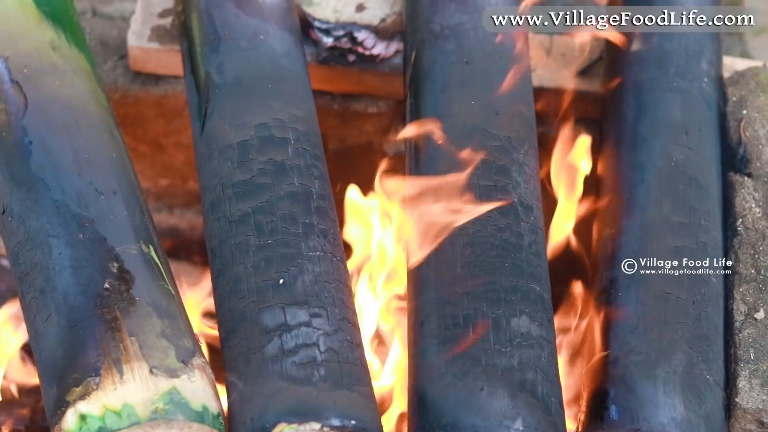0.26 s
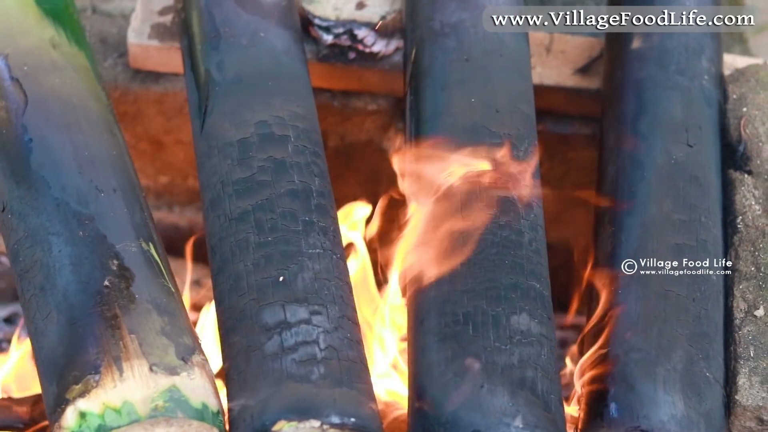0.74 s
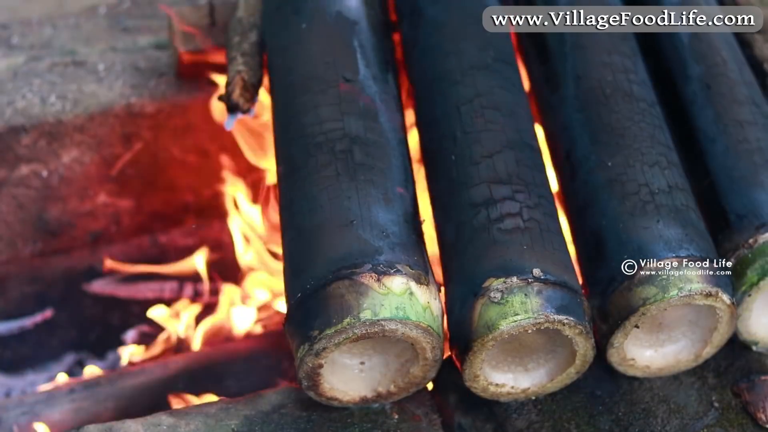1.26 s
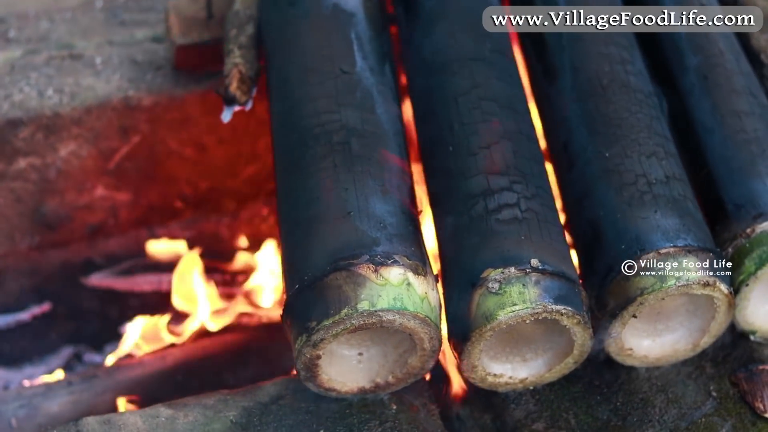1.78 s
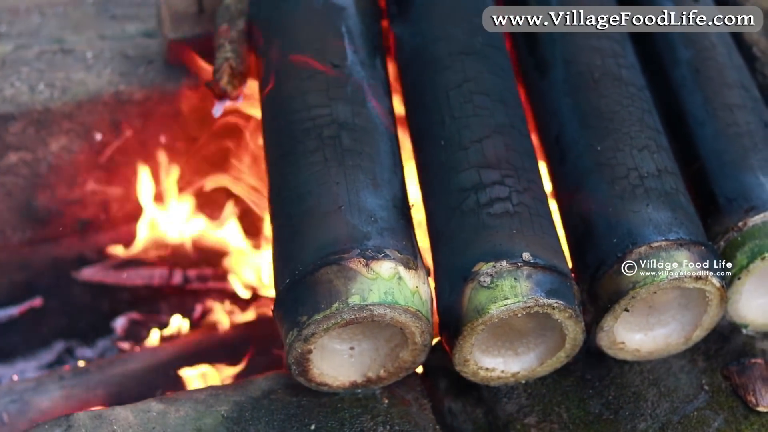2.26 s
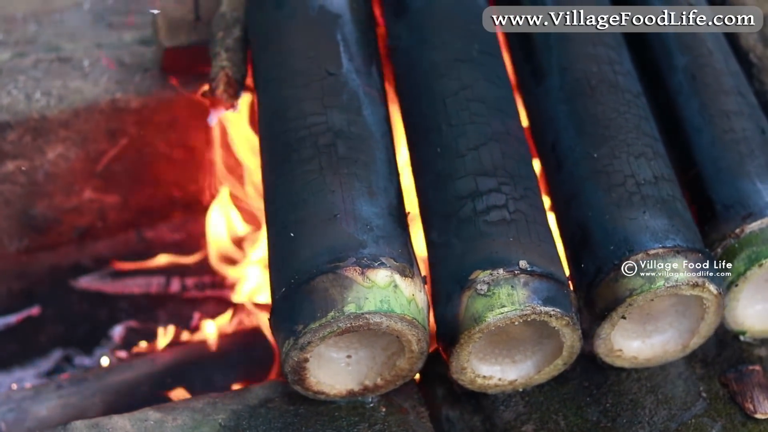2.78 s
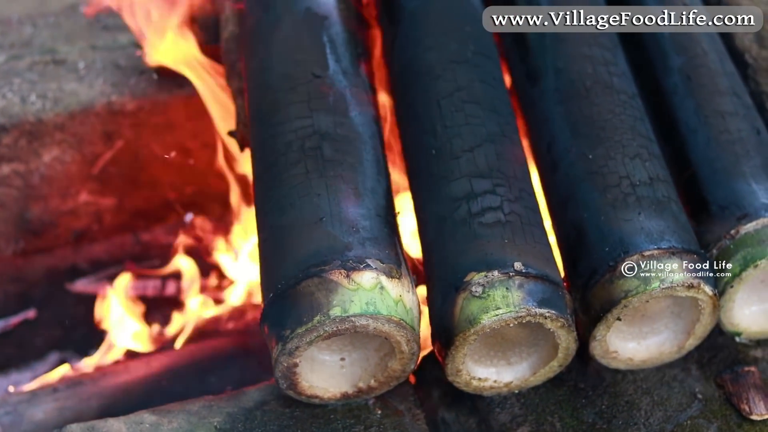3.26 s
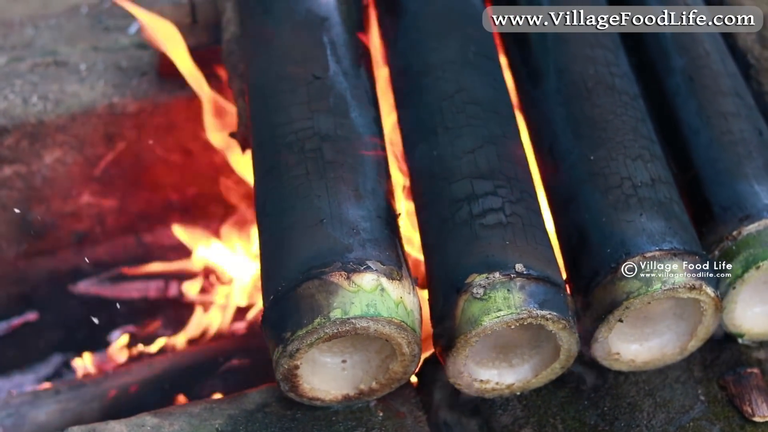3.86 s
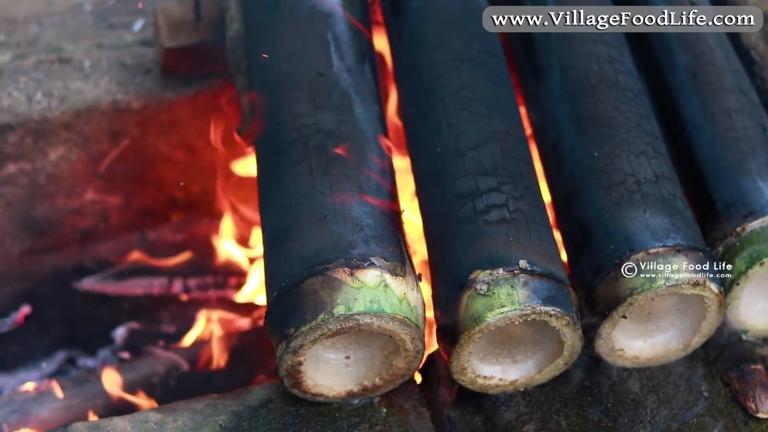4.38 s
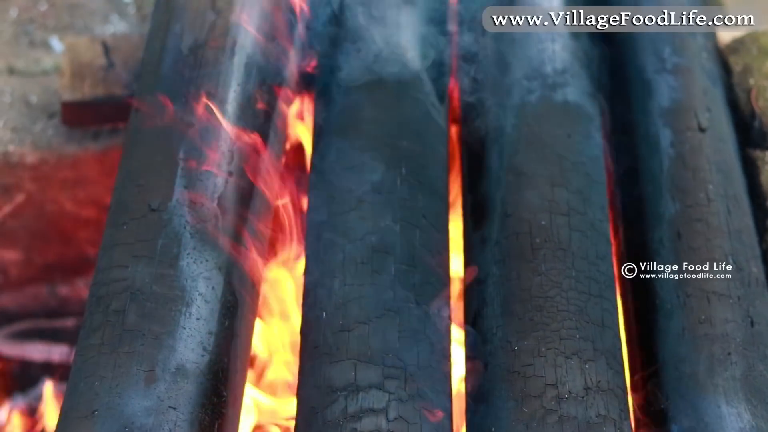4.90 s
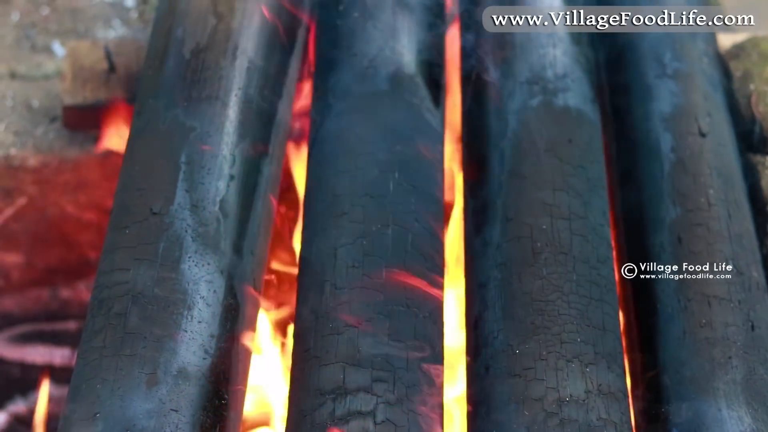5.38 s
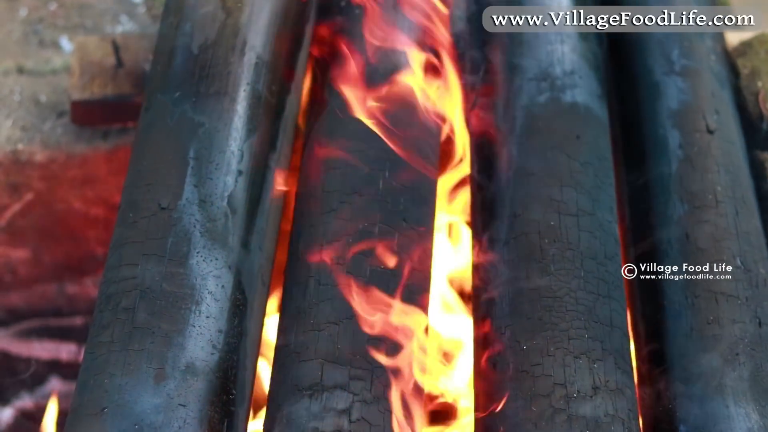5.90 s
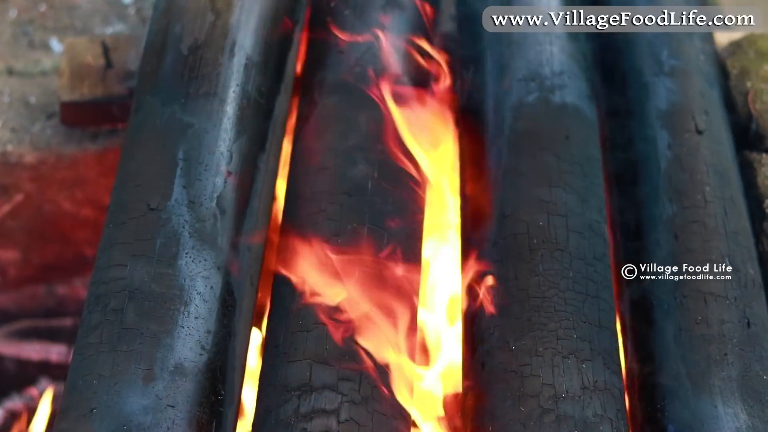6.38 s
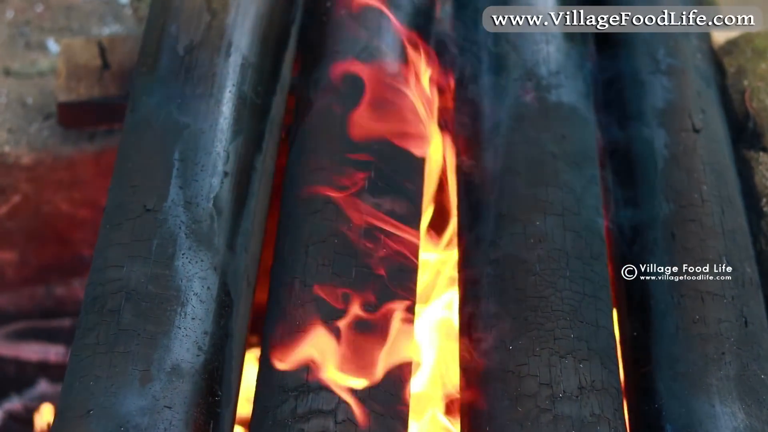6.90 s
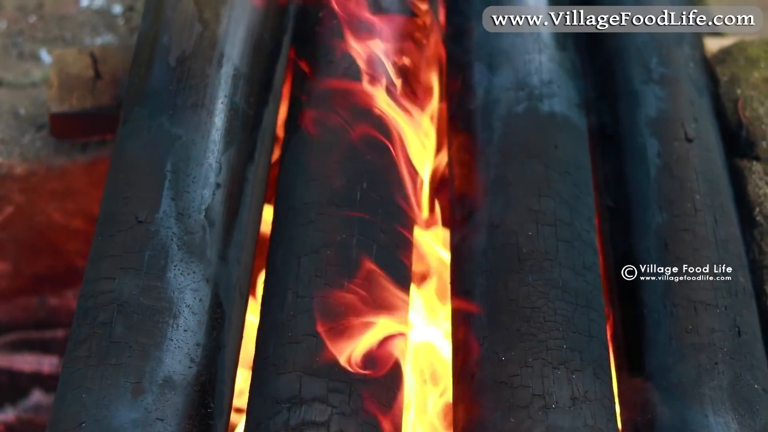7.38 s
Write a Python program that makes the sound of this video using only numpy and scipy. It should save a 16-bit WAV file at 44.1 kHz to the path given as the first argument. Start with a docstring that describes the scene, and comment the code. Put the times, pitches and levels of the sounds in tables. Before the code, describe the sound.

A quiet fire sizzle with faint hiss and a far engine's regular chugging opens; at about 1.2 seconds the perspective jumps closer to strong, airy steam jets, peaking near two seconds. A bright crack and a sharper snap follow. At 4.7 seconds the view shifts again to breathier hiss, low flame gusts and heavier, knocking wood pops with short outdoor echoes.

```python
"""A hiss throughout: sap boils out of splits in green bamboo tubes roasting over an open wood fire.
The steam is noise shaped by resonances and driven by a shared pressure curve; some splits sing alone.
Embers sizzle and tick, flames flutter in low puffs, and now and then wood bursts with a ringing pop.
Far off, a slow one-cylinder engine thumps: pulses ring through pipe resonances, over a bed of open air.
The scene is heard from three places in turn, each with its own levels."""
import sys
import numpy as np
from scipy import signal
from scipy.fft import rfft, irfft
from scipy.io import wavfile

SR = 44100
rng = np.random.default_rng(int(sys.argv[2]) if len(sys.argv) > 2 else 0)


def inscribe(sig):
    """Save sig as 16-bit PCM at rate SR to the path in sys.argv[1].

    A 1-D sig is mono; a 2-D sig holds one channel per row.
    Samples are clipped to [-1, 1] before scaling.
    """
    pcm = np.round(np.clip(np.atleast_2d(sig).T, -1, 1) * 32767)
    wavfile.write(sys.argv[1], SR, pcm.astype(np.int16))


N = 337365
TIME = np.arange(N) / SR
HZ = np.maximum(np.fft.rfftfreq(N, 1 / SR), 1)

# the three listening places: (start [s], end [s])
PLACES = [(0, 1.17), (1.17, 4.72), (4.72, 7.65)]

# steam pressure in the tubes, as a hiss level before each opening's own offset: (time [s], level [dB])
STEAM_PRESSURE = [(0.0, -58.5), (0.83, -60), (1.23, -49), (1.45, -48.5), (1.76, -49), (1.86, -44),
                  (2.04, -40.5), (2.3, -41), (2.68, -42.5), (2.9, -44), (3.64, -50), (4.69, -47),
                  (5.01, -51), (5.5, -49.5), (5.73, -52.5), (6.65, -54.5), (6.92, -51.5), (7.65, -53.5)]
# offset of each opening from that level, one value per place: (level [dB])
VENT_PLACE_DB = [-5, -2.5, 0.5]
SAP_PLACE_DB = [-3, 1, -3]
JET_PLACE_DB = [-10, -2, -1.5]
# resonances of each opening: (frequency [Hz], width [Hz], relative level [dB])
VENT_RESONANCES = [(6090, 620, 2.5), (6406, 440, 7.5), (6776, 490, 3.5), (7860, 300, -9), (10910, 710, 2.5)]
SAP_RESONANCES = [(4000, 480, -7.5), (4535, 480, -4.5), (5100, 360, -4), (5740, 480, -2.5),
                  (6380, 310, -1.5), (7010, 470, 3), (7720, 660, 1.5), (8260, 460, 2.5), (8760, 390, 1.5),
                  (9300, 510, 0), (10150, 760, -2), (13200, 550, -12), (14100, 600, -7.5), (14700, 480, -7),
                  (15300, 490, -9)]
JET_RESONANCES = [(7950, 420, -4), (8500, 290, -6.5), (9240, 450, -1), (9920, 440, 2), (10540, 780, 3.5),
                  (11600, 280, -2), (12950, 1200, -11.5)]
# an opening clears and spurts: (start [s], time from start to fading [s], lift [dB], opening [name])
SPURTS = [(0.868, 0.06, 1, "vent"), (0.873, 0.054, 5.5, "sap"), (1.07, 0.042, 6, "sap"),
          (1.183, 0.07, 6, "jet"), (1.175, 0.42, 3, "sap"), (1.187, 0.23, 3.5, "vent"),
          (1.35, 0.15, 5.5, "jet"), (1.366, 0.041, 2.5, "sap"), (1.978, 0.095, 3, "sap"),
          (1.986, 0.086, 2, "jet"), (2.348, 0.09, 3, "sap"), (2.622, 0.079, 6.5, "jet"),
          (2.62, 0.43, 0.8, "sap"), (3.084, 0.14, 4, "jet"), (3.36, 0.11, 6, "jet"),
          (3.559, 0.12, 7.5, "jet"), (3.57, 0.11, 3, "sap"), (3.89, 0.29, 7, "jet"),
          (3.905, 0.12, 6.5, "vent"), (4.11, 0.08, 1.5, "vent"), (4.366, 0.28, 6.5, "jet"),
          (4.37, 0.5, 3, "vent"), (4.957, 0.23, 3.5, "jet"), (5.244, 0.16, 3, "vent"),
          (5.33, 0.45, 1.5, "jet"), (5.497, 0.16, 4.5, "sap"), (6.87, 0.1, 4, "sap"),
          (7.447, 0.093, 3, "vent")]
SPURT_ATTACK_S, SPURT_RELEASE_S = 0.021, 0.015
# splits that open and sing for a while:
# (start [s], end [s], swell time [s], pitch [Hz], width [Hz], average level before panning [dB])
SINGING_SPLITS = [(0.85, 2.0, 0.081, 3380, 380, -61.5), (0.78, 1.373, 0.12, 5740, 1200, -58),
                  (0.819, 1.0, 0.076, 4800, 4500, -57), (0.988, 1.2, .03, 7240, 280, -62),
                  (1.13, 1.25, 0.035, 4140, 400, -59), (1.17, 1.3, .025, 14400, 3000, -53),
                  (1.2, 2.114, .03, 6000, 1100, -55.5), (1.36, 1.5, .03, 14200, 1500, -58),
                  (1.2, 2.04, .05, 4770, 300, -61), (1.86, 2.5, 0.076, 4660, 756, -57),
                  (2.02, 2.12, .025, 13500, 3000, -54), (2.354, 2.43, .02, 12800, 4000, -45),
                  (2.364, 2.42, .012, 4700, 2000, -53), (2.47, 2.55, 0.04, 3840, 320, -50),
                  (1.902, 4.9, .03, 1843, 330, -70.5), (3.49, 3.72, .04, 7950, 400, -55),
                  (3.9, 4.7, .04, 14600, 2500, -61), (4.72, 7.7, 0.024, 3020, 710, -62.5),
                  (4.728, 4.897, 0.026, 3040, 520, -58.5), (4.97, 5.158, 0.024, 3010, 450, -58.5),
                  (5.34, 5.65, .05, 2950, 450, -61), (5.78, 5.903, 0.025, 2900, 416.7, -54.5),
                  (6.68, 6.8, 0.032, 3000, 450, -59), (6.848, 6.95, .03, 3000, 450, -57),
                  (4.9, 6.996, .03, 3820, 509.3, -67.5), (4.72, 5.897, 0.035, 5330, 1700, -63),
                  (5.5, 5.95, .03, 11620, 260, -58), (4.733, 5.7, .03, 12700, 1500, -58),
                  (4.75, 7.7, 0.037, 8900, 2200, -62.5), (5.7, 7.74, .07, 12600, 2000, -65)]

# the fire at each place, before the settings of each layer: (relative level [dB])
EMBER_PLACE_DB = [-63, -58, -56.5]
FLAME_PLACE_DB = [-63.5, -68, -65]
# spectra of the sizzle, the flame flutter and the open air: (frequency [Hz], relative level per Hz [dB])
EMBER_SPECTRUM = [(400, -18.5), (800, -7.5), (1350, -4.5), (1800, -0.5), (2200, -1), (3000, 2.5),
                  (4000, 1.5), (5300, -0.5), (8000, -8.5), (11000, -11), (12000, -1), (15500, -9.5)]
FLUTTER_SPECTRUM = [(60, -3.5), (130, -0.5), (200, 1.5), (310, 1), (400, -15), (520, -10), (900, -12),
                    (2000, -49)]
AIR_SPECTRUM = [(20, -32), (45, 1.5), (56, 4), (64, 5), (76, 7), (160, -4), (400, -12.5), (1000, -11),
                (1500, -12.5), (3000, -16), (7000, -28), (15500, -32)]
# big tongues of flame tearing off:
# (time at the height [s], swell time [s], flutter lift [dB], rush pitch [Hz], rush level before panning [dB])
FLAME_TONGUES = [(0.115, .025, 3, 250, -58), (0.228, 0.019, 2, 270, -54), (0.44, 0.023, -1, 307, -59),
                 (0.478, .012, 1, 230, -60), (1.4, 0.032, 1, 330, -62.5), (2.0, 0.036, 4, 204, -56),
                 (2.53, 0.028, 3, 216, -60), (4.63, 0.024, 0, 180, -58.5), (4.765, 0.034, 2.5, 424, -57.5),
                 (4.795, .03, 2, 880, -61), (4.91, 0.03, 3, 346, -61), (5.025, 0.034, 4, 338, -55),
                 (5.385, .025, 7, 330, -57), (5.608, 0.023, 7, 258, -56), (6.53, 0.025, 0, 268, -61),
                 (6.635, .025, 4, 295, -61), (7.245, .03, 1, 177, -52.5), (7.52, 0.024, 3, 257, -58)]

# bursting wood, levels before a common trim: (time [s], thud [dB], knock [dB], clack [dB], crack [dB],
# snap [dB], spit [dB], tearing time [ms], pitch factor [ratio], extra scatter [dB])
WOOD_POPS = [(0.21, -52, -76, -66, -61, -68, -70, 5.5, 0.8, 0),
             (1.264, -47.5, -67, -66, -60, -59, -57, 1.2, 0.7, 1),
             (2.3657, -52.5, -59, -64, -52, -49, -39, 3.4, 0.94, -1),
             (4.3627, -60, -46, -47, -38, -36, -25.5, 1.5, 1.07, -2.5),
             (5.3355, -38.5, -74, -60, -43.5, -46, -50, 4.3, 1.0, 2.5),
             (5.661, -81, -77, -72, -69, -62, -48, 1.1, 1.3, 0),
             (6.1563, -39, -41.5, -38.5, -32, -34.5, -54, 1.6, 0.94, -0.5),
             (7.0626, -35.5, -55, -48, -44, -37.5, -45.5, 2.8, 0.98, 2.5)]
# the six parts of a pop: (low edge [Hz], high edge [Hz], share of tearing time [ratio], echo [dB],
# echo time to fall 60 dB [s], difference between the ears [ratio], left over right [dB])
POP_PARTS = [(126, 540, 0.15, -11, 0.27, 0.075, 1.5), (710, 1210, 1, -5, 0.2, 0.22, 1),
             (1500, 2500, 0.46, -5, 0.23, 0.84, 3), (2450, 5150, 1.4, -0.5, 0.4, 0.52, 1),
             (5500, 7940, 0.61, -6, 0.27, 0.67, -1), (8300, 16300, 1.5, -6.5, 0.22, 1, 5)]
# what the wood rings with, before the pitch factor: (frequency [Hz], width [Hz], relative level [dB])
WOOD_RESONANCES = [(278, 196, 5.5), (434, 230, 2), (880, 560, -1.5), (1780, 750, -1), (2460, 330, 3),
                   (3140, 620, 4), (4500, 1400, 2.5), (6650, 1960, 4.5), (9400, 1140, 0),
                   (12200, 2500, -3.5)]
# notes of pieces that break off: (start [s], pitch [Hz], time to fall 60 dB [s], starting level [dB])
BROKEN_PIECE_NOTES = [(0.014, 775, 0.05, -50), (4.3624, 245, 0.027, -39), (4.3624, 830, .014, -34.5),
                      (4.3624, 1080, .013, -34), (4.3624, 2490, 0.02, -34), (4.3624, 3600, 0.017, -32.5),
                      (4.3624, 4450, .007, -29), (4.3624, 5300, .007, -24), (4.3624, 10160, 0.015, -17),
                      (5.336, 1455, .026, -43), (5.336, 3050, 0.034, -40), (5.336, 4500, .012, -39),
                      (5.336, 6300, .025, -32), (5.6615, 14300, 0.0083, -29), (6.1565, 600, 0.0092, -29),
                      (6.1565, 850, .018, -34), (6.1565, 1770, 0.015, -23.5), (6.1565, 2350, .01, -32),
                      (6.1565, 3220, 0.02, -26), (6.1565, 4000, .009, -23), (6.1565, 4600, 0.0087, -28),
                      (6.1565, 6100, .02, -30), (7.0635, 1950, 0.015, -41), (7.0635, 2450, .02, -47),
                      (7.0635, 3180, .025, -40), (7.0635, 6350, .012, -27), (7.0635, 7450, .008, -36)]

# engine puffs from each place, before overall scaling: (relative level [dB])
ENGINE_PLACE_DB = [-54.5, -55.5, -52]
# first firing at each place, before the small timing scatter: (time [s])
FIRST_FIRING_S = [-.0145, 1.1755, 4.7505]
# puffs of the four strokes of one cycle: (relative level [dB])
STROKE_DB = [-1, -14.5, -12, -16]
CYCLE_S, CLATTER_DECAY_S = 0.08772, 0.028
# exhaust pipe resonances added to the thump: (frequency [Hz], width [Hz], relative level [dB])
PIPE_RESONANCES = [(46.7, 10, 5), (64.3, 8.1, 7), (135, 6.7, -6), (204.3, 6.3, 10.5), (293, 41, 2.5)]

# stereo spread, as side over mid: (frequency [Hz], level [dB])
STEREO_WIDTH = [(60, -15), (300, -11), (700, -5), (2500, -7.5), (5500, -7), (9000, -2), (14000, 0)]


def jet(modes, level_db, sputter_db, gust_db, left_db):
    """Steam through an opening: boiling sap makes the flow sputter, and each resonance swells on its own."""
    hiss = np.zeros((2, N))
    for hz, width, db in modes:
        gusts = from_db(db + gust_db * drift(4.2))
        hiss += gusts * np.sqrt(width) * whistle(hz, width)
    sputter = from_db(level_db + sputter_db * drift(30))
    return sputter * rms_one(hiss) * pan(left_db)


def flow(opening, place_db, follows):
    """Steam level at one opening: it follows the pressure, and each spurt opens fast, holds and dies away."""
    pressure_db, = in_time(STEAM_PRESSURE)
    average_db = pressure_db.mean()
    level_db = by_place(place_db) + average_db + follows * (pressure_db - average_db)
    for start, hold, lift_db, where in SPURTS:
        if where == opening:
            t = TIME - start
            attack = np.clip(t / SPURT_ATTACK_S, 0, 1)
            release = np.exp(-np.maximum(t - hold, 0) / SPURT_RELEASE_S)
            level_db = level_db + lift_db * attack * release
    return level_db


def splits(waver_db):
    """A split opens, sings at its own pitch as steam rushes through, and closes again."""
    out = np.zeros((2, N))
    for start, end, swell_s, hz, width, db in SINGING_SPLITS:
        span = slice(int(start * SR), min(int(end * SR), N))
        t = TIME[span]
        opening = np.clip(np.minimum(t - start, end - t) / swell_s, 0, 1)
        wavering = from_db(db + waver_db * drift(14.0)[span])
        out[:, span] += opening * wavering * whistle(hz, width, size=len(t))
    return out


def embers(level_db, per_s, size_db, hiss_db, tick_db):
    """A broad sizzle with tiny ticks of uneven size scattered left and right."""
    hiss = turbulence(colour(EMBER_SPECTRUM))
    sizes = from_db(size_db * np.minimum(rng.exponential(1, N), 4)) * rng.choice([-1, 1], N)
    struck = rng.random(N) < per_s / SR
    ticks = struck * sizes * pan(rng.normal(0, 12.0, N))
    ticks = rms_one(band(ticks, 1550, 8000, order=1))
    mix = from_db(hiss_db) * hiss + from_db(tick_db) * ticks
    return from_db(level_db) * mix * pan(-0.59)


def flames(trim_db, lumpy_db, rush_width):
    """Soft, low puffs of flame, with tongues that each rush at their own pitch; width is a share of pitch."""
    level_db = by_place(FLAME_PLACE_DB)
    rushes = np.zeros((2, N))
    for s, swell_s, lift_db, hz, rush_db in FLAME_TONGUES:
        swell = np.exp(-((TIME - s) / swell_s) ** 2)
        level_db = level_db + lift_db * swell
        near = swell > .02
        rush = whistle(hz, rush_width * hz, size=near.sum())
        rushes[:, near] += from_db(rush_db) * swell[near] * rush
    puffs = rms_one(from_db(lumpy_db * drift(21.0)))
    flutter = from_db(level_db + trim_db) * puffs * turbulence(colour(FLUTTER_SPECTRUM))
    return (flutter + rushes) * pan(1.0)


def pops(gain_db, shock, echo_rise_s):
    """A steam pocket bursts: one shock, a few ms of tearing fibres, then scatter from the yard."""
    out, t = np.zeros((2, N + SR)), TIME[:SR // 4]
    # levels refer to the energy of a 10 ms burst
    burst_scale = np.sqrt(.01 * SR / len(t))
    for s, *levels, tear_ms, pitch, scatter_db in WOOD_POPS:
        at = int(s * SR)
        for db, part in zip(levels, POP_PARTS):
            low, high, share, echo_db, t60, apart, left_db = part
            noise = rng.standard_normal((6, len(t)))
            tear_fade = np.exp(-np.minimum(1e3 * t / (share * tear_ms), 30))
            tear = (noise[0] + apart * noise[1:3]) * tear_fade
            tear[:, 0] += shock
            echo_shape = (1 - np.exp(-t / echo_rise_s)) * from_db(-60 * t / t60)
            scatter = (noise[3] + 2 * apart * noise[4:]) * echo_shape
            ringing = wood(np.array([tear, scatter]), pitch)
            direct, echo = band(ringing, low * pitch, high * pitch, order=3)
            pop = rms_one(direct) + from_db(echo_db + scatter_db) * rms_one(echo)
            out[:, at:at + len(t)] += from_db(db + gain_db) * burst_scale * pop * pan(left_db)
    return out[:, :N]


def wood(x, pitch):
    """Wood resonances side by side, signs alternating; a larger pitch factor makes them ring higher."""
    total = 0
    for k, (hz, width, db) in enumerate(WOOD_RESONANCES):
        total = total + (-1) ** k * from_db(db) * resonate(x, hz * pitch, width)
    return total


def rings(echo_db, echo_t60):
    """The snap sets a broken piece ringing in fading notes, and the yard scatters them."""
    out, t = np.zeros((2, N + SR)), TIME[:SR // 4]
    for k, (s, hz, t60, db) in enumerate(BROKEN_PIECE_NOTES):
        # the direct path, then a fading noise of echoes
        paths = rng.standard_normal((2, len(t))) * from_db(echo_db - 60 * t / echo_t60)
        paths[:, 0] = 1
        note = (-1) ** k * from_db(db - 60 * t / t60) * np.sin(2 * np.pi * hz * t)
        heard = signal.fftconvolve(paths, note[None], axes=1)
        at = int(s * SR)
        out[:, at:at + heard.shape[1]] += heard
    return out[:, :N]


def engine(thump_hz, thump_width, uneven_db, clatter_db):
    """Each firing sends a round thump down the exhaust; the other strokes puff weakly."""
    puffs, firings = np.zeros(N), np.zeros(N)
    for (start, end), first, db in zip(PLACES, FIRST_FIRING_S, ENGINE_PLACE_DB):
        at = np.arange(first, end, CYCLE_S / len(STROKE_DB))
        stroke = np.arange(len(at)) % len(STROKE_DB)
        unevenness = uneven_db * rng.standard_normal(len(at))
        size = from_db(db + np.array(STROKE_DB)[stroke] + unevenness)
        at = at + rng.normal(0, 0.00034, len(at))
        heard = (at > start) & (at < TIME[-1])
        index = (at[heard] * SR).astype(int)
        puffs[index] = size[heard]
        firings[index] = (size * (stroke == 0))[heard]
    # the chambers of the silencer round each puff off
    thump = puffs
    for _ in range(3):
        thump = resonate(thump, thump_hz, thump_width)
    body = sum(from_db(db) * resonate(thump, hz, width) for hz, width, db in PIPE_RESONANCES)
    exhaust = from_db(-54) * rms_one(thump + body)
    # metal clatter follows each firing; it carries best to the first place
    fade = np.exp(-1 / (CLATTER_DECAY_S * SR))
    knock = rms_one(signal.lfilter([1], [1, -fade], firings))
    open_path = from_db(np.where(TIME < PLACES[0][1], 0, -5.5))
    metal = turbulence(cavity([(1038, 320, -3.5), (1310, 80, -6.5)]))
    return exhaust * pan(2.4) + from_db(clatter_db) * knock * open_path * metal


def open_air(level_db):
    """Steady noise, strongest in the bass, makes the open air of the background."""
    return from_db(level_db) * turbulence(colour(AIR_SPECTRUM))


def by_place(levels_db):
    """A level that steps from one listening place to the next."""
    return np.select([TIME < end for _, end in PLACES[:-1]], levels_db[:-1], levels_db[-1])


def whistle(hz, width, size=N):
    """Turbulence in one steep-sided resonance, with the stereo spread of its pitch; rms 1."""
    noise = rng.uniform(-1, 1, (2, size))
    mid, side = resonate(resonate(noise, hz, width), hz, width)
    side = side * from_db(np.interp(hz, *np.transpose(STEREO_WIDTH)))
    return rms_one(np.array([mid + side, mid - side]))


def turbulence(gain):
    """Stereo noise of a given colour, alike in the bass and wide in the treble; rms 1."""
    mid, side = rfft(rng.standard_normal((2, N)))
    wide = colour(STEREO_WIDTH)
    ears = (mid + wide * side * [[1], [-1]]) / np.sqrt(1 + wide ** 2)
    return rms_one(irfft(gain * ears, N))


def drift(rate):
    """Slow random wandering with spread 1; rate in Hz, worked out at every 50th sample."""
    r = np.exp(-100 * np.pi * rate / SR)
    noise = rng.standard_normal(N // 50 + 1002)
    # drop the start, where the filter is still settling
    slow = signal.lfilter([1], [1, -2 * r, r * r], noise)[1000:]
    return np.interp(np.arange(N) / 50, np.arange(len(slow)), rms_one(slow))


def resonate(x, hz, width):
    """One resonance with gain 1 on top; a narrower width rings longer."""
    r = np.exp(-np.pi * width / SR)
    top = np.array([1, 0, -1]) * (1 - r * r) / 2
    return signal.lfilter(top, [1, -2 * r * np.cos(2 * np.pi * hz / SR), r * r], x + 1e-18)


def cavity(modes):
    """Gain at every frequency of steep-sided resonances, added as power."""
    power = 0
    for hz, width, db in modes:
        power = power + from_db(db) ** 2 / (1 + (2 * (HZ - hz) / width) ** 2) ** 2
    return np.sqrt(power)


def band(x, low_hz, high_hz, order=2):
    """Band-pass filter that keeps the sound between two frequencies."""
    edges = np.clip([low_hz, max(high_hz, low_hz * 1.1)], 10, .48 * SR)
    return signal.sosfilt(signal.butter(order, edges, "band", fs=SR, output="sos"), x + 1e-18)


def colour(points):
    """Gain at every frequency from a short spectrum."""
    hz, db = np.transpose(points)
    return from_db(np.interp(np.log(HZ), np.log(hz), db))


def in_time(rows):
    """One curve over time for each column after the first."""
    s, *columns = np.transpose(rows)
    return [np.interp(TIME, s, c) for c in columns]


def pan(left_db):
    """Gains of the two ears, from how much louder the left is in dB."""
    return from_db(np.array([[.5], [-.5]]) * left_db)


def rms_one(x):
    """Scale to an average strength (rms) of 1."""
    return x / np.sqrt(np.mean(x ** 2) + 1e-20)


def from_db(db):
    """Decibels to gain."""
    return np.exp(np.asarray(db) * (np.log(10) / 20))


def scene():
    """Steam, fire and pops close by, over the open air and the far engine."""
    vent_db = flow("vent", VENT_PLACE_DB, follows=0.91)
    sap_db = flow("sap", SAP_PLACE_DB, follows=0.95)
    jet_db = flow("jet", JET_PLACE_DB, follows=0.73)
    steam = jet(VENT_RESONANCES, vent_db, sputter_db=-0.15, gust_db=2.3, left_db=-3.0)
    steam = steam + jet(SAP_RESONANCES, sap_db, sputter_db=1.04, gust_db=2.55, left_db=2.5)
    steam = steam + jet(JET_RESONANCES, jet_db, sputter_db=1.0, gust_db=2.1, left_db=4.5)
    steam = steam + splits(waver_db=2.2) * pan(-4.0)
    fire = embers(by_place(EMBER_PLACE_DB), per_s=200, size_db=4.5, hiss_db=5.0, tick_db=-9.0)
    fire = fire + flames(trim_db=2.0, lumpy_db=2.0, rush_width=0.44)
    bursts = pops(gain_db=-0.9, shock=3.8, echo_rise_s=0.0019)
    bursts = bursts + rings(echo_db=-38.0, echo_t60=0.26)
    far = engine(thump_hz=91.9, thump_width=68.8, uneven_db=0.8, clatter_db=-66.0)
    return steam + fire + bursts + far + open_air(level_db=-58.5)


def record(dry):
    """The top is cut steeply above 15.9 kHz."""
    return signal.sosfilt(signal.ellip(10, .2, 70, 15900, fs=SR, output="sos"), dry)


dry = scene()
out = record(dry)
inscribe(out)
```